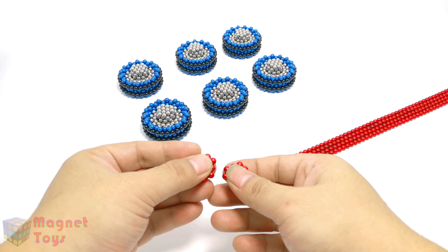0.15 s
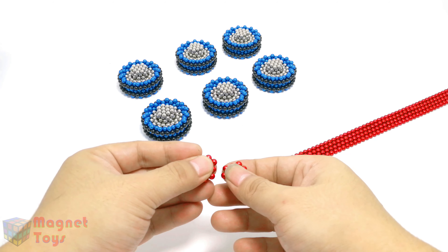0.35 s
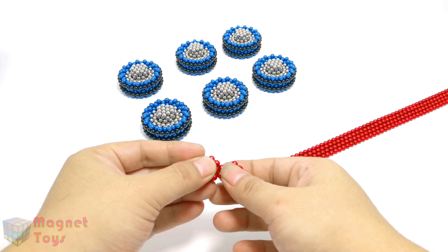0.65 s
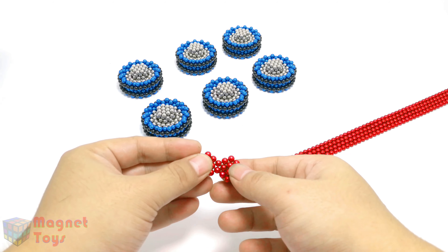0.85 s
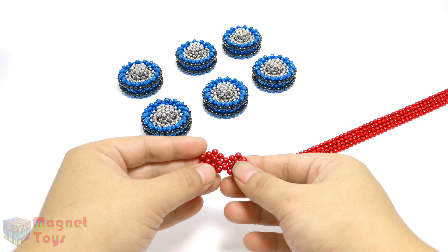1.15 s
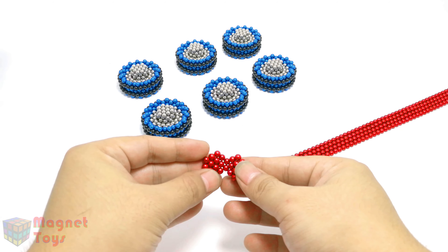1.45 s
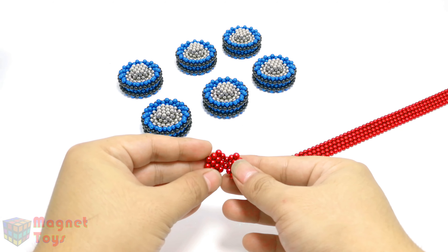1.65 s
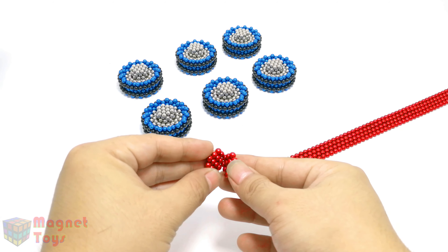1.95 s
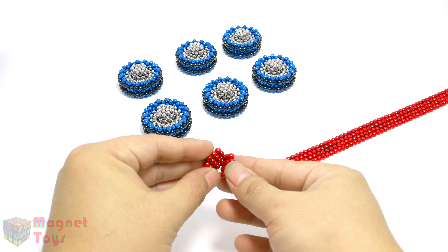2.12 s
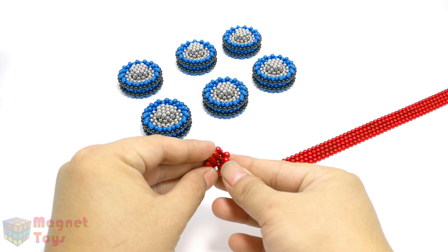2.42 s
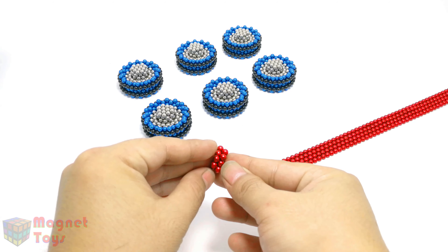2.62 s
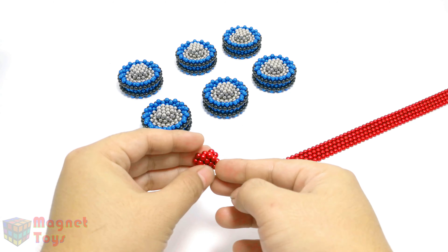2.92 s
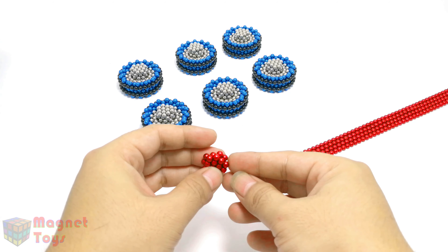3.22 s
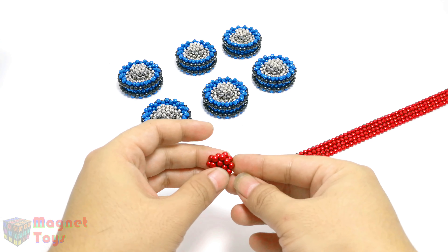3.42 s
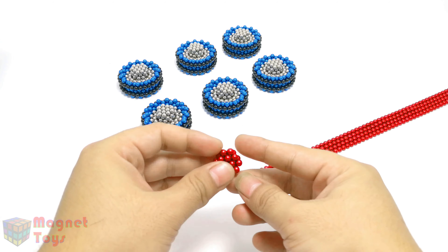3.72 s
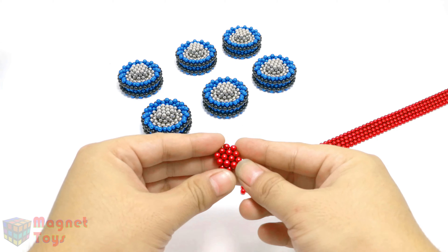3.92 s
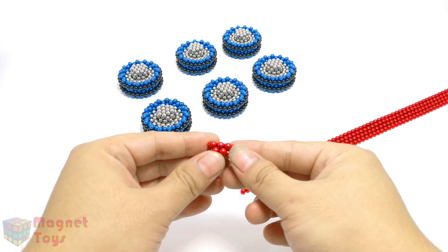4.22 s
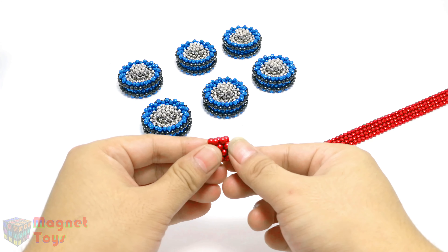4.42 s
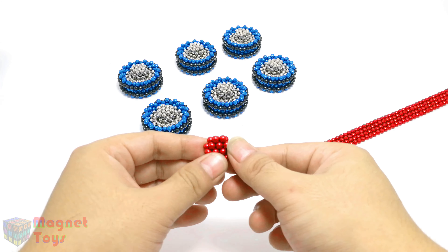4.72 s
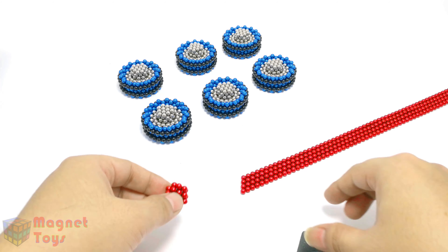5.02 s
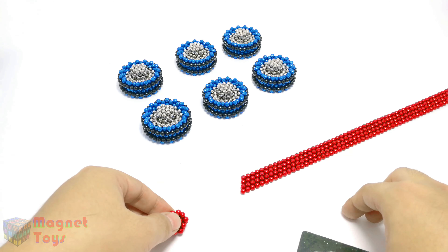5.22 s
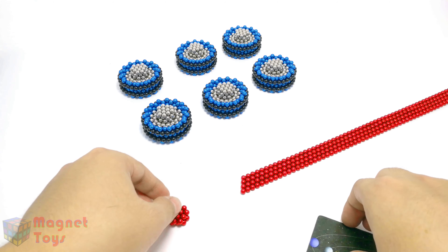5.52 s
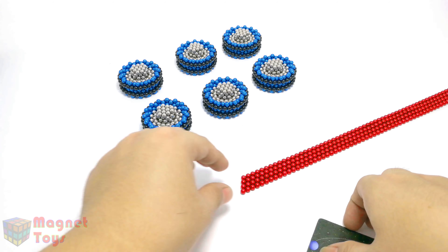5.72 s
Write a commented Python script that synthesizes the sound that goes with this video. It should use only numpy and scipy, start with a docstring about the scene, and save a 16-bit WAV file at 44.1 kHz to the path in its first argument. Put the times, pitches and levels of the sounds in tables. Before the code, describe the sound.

Small magnetic balls snap together in sharp clicks, then the piece knocks and scrapes briefly on a table over a faint fan hum.

```python
"""Small magnetic balls snap together in tiny chattering bursts, close to the left microphone in a small dry room.
The piece is then set down on a table with a knock, shoved along and tipped over with another, and fingers brush past.
Snaps are clusters of filtered clicks; knocks are short pushes that ring the modes of the table top.
Scrapes and brushes are streams of random tiny slips, and a fan hums and rushes behind them under hiss."""
import sys
import numpy as np
from scipy import signal
from scipy.fft import rfft, irfft
from scipy.io import wavfile

SR = 44100
rng = np.random.default_rng(int(sys.argv[2]) if len(sys.argv) > 2 else 0)


def to_wav(s):
    """Save 16-bit WAV."""
    ch = np.atleast_2d(s).T  # columns
    pcm = np.round(np.clip(ch, -1, 1) * 32767)  # PCM
    wavfile.write(sys.argv[1], SR, pcm.astype(np.int16))


N = 258426
TIME = np.arange(N) / SR

# balls snapping together: (time [s], level of the burst's energy [dB], fading time of the chatter [s],
# brightest frequency [Hz], strength of the first rebound [share], boost or cut of the low cluster knock [dB])
SNAPS = [(0.469, 5.5, 0.00067, 14000, 0.65, 3), (2.3644, 6, 0.00071, 8600, 0.046, -8),
         (2.3725, 5, 0.00057, 12900, 0.5, 0), (2.4929, 0.5, 0.00015, 10300, .12, -8),
         (2.4962, 4.5, 0.00055, 10200, .18, -3), (3.6055, -30.5, .0005, 9000, .2, 0),
         (4.8848, -32.5, .0005, 10000, .2, 4), (5.1513, -17, 0.0023, 9250, .13, 17),
         (5.3597, -7, .0015, 11200, 0.065, 20)]
# what one contact of two balls radiates: (frequency [Hz], level [dB])
BALL_COLOUR = [(100, -37), (600, -20.5), (1300, -14), (2800, -16.5), (3500, -13), (4500, -7), (5500, -4),
               (6700, 0.5), (7450, 0), (8400, -5.5), (10100, 0.5), (13000, 3), (14200, 6.5), (16500, -5)]
# how the snaps change on the way to the right microphone: (frequency [Hz], gain [dB])
SNAP_SHADOW = [(500, -2), (1500, -16), (3000, -17.5), (5500, -25), (8000, -28), (12000, -31), (16000, -25)]


def snaps(pull_s=0.00015, chatter=0.9, rebound_s=0.000373, focus_db=7.0, body_hz=3400, soft_hz=9800, order=6):
    """One hard contact amid a sub-millisecond chatter of neighbouring balls, followed by two quick, softer rebounds."""
    out = np.zeros(N)
    t = np.arange(-128, 384) / SR  # the hard contact is at zero
    hz = np.fft.rfftfreq(len(t), 1 / SR)
    delay = np.exp(-2j * np.pi * hz * rebound_s)
    bounce = delay / (1 + (hz / soft_hz) ** order)
    for s, db, settle_s, bright_hz, rebound, body_db in SNAPS:
        envelope = np.exp(-np.maximum(-t / pull_s, t / settle_s))
        contacts = chatter * rng.standard_normal(len(t)) * envelope
        contacts[t == 0] = 1
        # the chatter only smears the click in time; the evenly spaced rebounds give it a pitch
        smear = np.exp(1j * np.angle(rfft(contacts)))
        rebounds = 1 + rebound * bounce + (rebound * bounce) ** 2
        fade_in = np.exp(np.minimum(t, 0) / (2 * pull_s))
        clicks = irfft(smear * rebounds) * fade_in

        def ball_db(f):
            """A ball's own colour, weakened away from the brightest frequency."""
            octaves_away = abs(np.log2((f + 1) / bright_hz))
            return read(BALL_COLOUR, f) - focus_db * np.minimum(octaves_away, 1)

        burst = colour(clicks, ball_db)
        # when whole clusters collide, their mass adds a lower knock
        burst = colour(burst, lambda f: body_db / (1 + (f / body_hz) ** order))
        add(out, s + t[0], amp(db) * unit_energy(burst))
    left = out + room(out, wet_db=-3.5)
    right = colour(out + room(out, wet_db=5.5), lambda f: read(SNAP_SHADOW, f))
    return np.array([left, right])


# blows on the table: (time [s], level of the push before its treble is cut [dB],
# highest frequency that the contact excites [Hz], tilt [dB per octave])
KNOCKS = [(4.84, -8.5, 340, 0.5), (5.1518, 1.5, 2380, 5), (5.36, 1.5, 4900, 0.85), (5.748, -23, 198, -9)]


def knocks(low_hz=110, order=14):
    """Each blow is a short push: the softer the contact, the less treble it holds."""
    force = np.zeros(N)
    push = signal.unit_impulse(1024)
    for s, db, top_hz, tilt_db in KNOCKS:
        def push_db(hz):
            """A tilted spectrum with a steep upper edge."""
            tilt = tilt_db * np.log2((hz + 50) / 700)
            return tilt - 10 * np.log10(1 + (hz / top_hz) ** order)

        add(force, s, amp(db) * colour(push, push_db))
    # a board radiates little deep bass
    high_pass = signal.butter(2, low_hz, "high", fs=SR, output="sos")
    return table_top(signal.sosfilt(high_pass, force))


# modes of the table top: (frequency [Hz], level [dB], time to fall by 60 dB [s],
# lag at the right microphone [radians])
TABLE_MODES = [(187.6, -9.5, 0.15, -1.1), (273, -1, 0.12, 0.63), (377, -11, 0.12, -1.4),
               (451, -0.5, 0.064, 0.18), (554, 12, 0.042, 0.77), (608, 2, 0.12, 0.68),
               (698, 4, 0.059, 0.54), (774, -24, 0.16, 1.2), (960, -3.5, 0.087, 1.1),
               (1280, -5, 0.043, 0.22), (1816, -4, 0.08, 1.5), (1890, -16, 0.24, -1.6),
               (2617, -3, 0.09, 0.66)]
# colour of its dense short-lived modes and of its thud: (frequency [Hz], level [dB])
TABLE_WASH = [(50, -31), (130, -36), (245, -5), (320, -3), (450, 3), (620, -16), (1000, 2), (1600, -1.5),
              (2600, -1.5), (4000, 2), (8000, -20), (16000, -8.5)]


def table_top(force, wash_db=-3, wash_t60=0.11, thud_db=-8, thud_s=0.0058, echo_s=0.0086, echo_db=-4):
    """The board answers a force with a first thud, its main modes and a wash of dense ones; a nearby wall echoes it."""
    t = np.arange(SR // 2) / SR
    washes, thuds = noise_pair(len(t)), noise_pair(len(t))
    out = []
    for side in range(2):  # left, right
        modes = np.zeros(len(t))
        for hz, db, t60, lag in TABLE_MODES:
            modes += amp(db - 60 * t / t60) * np.sin(2 * np.pi * hz * t - side * lag)
        dense = colour(washes[side] * amp(-60 * t / wash_t60), lambda hz: read(TABLE_WASH, hz))
        thud = colour(thuds[side] * np.exp(-t / thud_s), lambda hz: read(TABLE_WASH, hz))
        ring = unit_energy(modes)
        ring += amp(wash_db) * unit_energy(dense)
        ring += amp(thud_db) * unit_energy(thud)
        add(ring, echo_s, amp(echo_db) * ring)
        out.append(signal.oaconvolve(force, unit_energy(ring))[:N])
    return np.array([out[0], shaded(out[1])])


# shoves of the piece along the table: (time of the middle [s], half length [s], level before colouring [dB])
SHOVES = [(5.253, 0.036, -42), (5.333, 0.019, -46.5)]
# colour of the scrape: (frequency [Hz], level [dB])
SCRAPE_COLOUR = [(200, -59), (600, 13.5), (1100, 4.5), (2400, 4), (4200, 3), (8000, -3.5), (12000, -3.5),
                 (16000, -10)]
PRESS_DB = -2  # force on the board, relative to the uncoloured slips
# judder after a blow: delay of the swell, its half length, its level relative to the blow
JUDDER_AFTER_S, JUDDER_HALF_S, JUDDER_DB = 0.047, 0.056, -38.5
# the piece rocks on the board in a narrow band: its centre, its half width, the greatest drop away from it
ROCK_HZ, ROCK_WIDTH_HZ, ROCK_DROP_DB = 662, 69, 8.5


def slide(right_db=-0.5):
    """Balls catch and slip: a fine scrape with each shove and a judder after each blow, which set the board ringing."""
    slips = unit_rms(grit(per_s=6100, spread_db=3))
    shoved = slips * sum(amp(db) * swell(s, half_s) for s, half_s, db in SHOVES)
    scrape = colour(shoved, lambda hz: read(SCRAPE_COLOUR, hz))
    left = scrape + room(scrape, wet_db=-2.0)
    right = shaded(room(scrape, wet_db=-0.5))  # reflections only
    force = amp(PRESS_DB) * shoved
    for s, db, top_hz, _ in KNOCKS:
        strength = swell(s + JUDDER_AFTER_S, JUDDER_HALF_S) * (TIME > s)
        judder = amp(db + JUDDER_DB) * slips * strength
        force += colour(judder, lambda hz: -20 * np.log10(1 + (hz / top_hz) ** 2))

    def rock_db(hz):
        """A peak at the rocking frequency."""
        peak = 1 / (1 + ((hz - ROCK_HZ) / ROCK_WIDTH_HZ) ** 2)
        return ROCK_DROP_DB * (peak - 1)

    board = table_top(colour(force, rock_db), wash_db=-5, thud_db=-14)
    return np.array([left, right]) + amp([[0], [right_db]]) * board


# fingers brushing and catching: (time of the middle [s], half length [s], level at the middle [dB],
# brightest frequency [Hz])
BRUSHES = [(3.71, .035, -59.5, 1180), (3.792, 0.056, -62.5, 1570), (5.043, 0.0021, -50, 3580),
           (5.074, .003, -52, 3560), (5.079, 0.022, -56, 3200), (5.606, 0.0026, -50, 4300),
           (5.62, 0.012, -48.5, 1960), (5.701, 0.033, -48.5, 1680), (5.753, 0.0068, -51.5, 4570),
           (5.809, 0.032, -43.5, 1760)]
# colour of rubbing skin: (distance from the brightest frequency [octaves], level [dB])
SKIN_COLOUR = [(-3, -15), (-1.2, -12), (-.6, -9), (-.25, -1), (.1, 0), (.45, -6), (1, -10), (2, -19),
               (3, -27)]


def brushes(right_db=-1):
    """Skin rubbing over balls and table: short swells of soft grit."""
    out = np.zeros(N)
    octaves, skin_db = np.transpose(SKIN_COLOUR)
    for s, half_s, db, bright_hz in BRUSHES:
        slips = grit(per_s=4600, spread_db=1.5)
        rub = colour(slips, lambda hz: np.interp(np.log2((hz + 1) / bright_hz), octaves, skin_db))
        out += amp(db) * unit_rms(rub) * swell(s, half_s)
    left = out + room(out, wet_db=-5.5)
    right = amp(right_db) * shaded(room(out, wet_db=2.5))  # reflections only
    return np.array([left, right])


# how table sounds change on the way to the right microphone: (frequency [Hz], gain [dB])
SHADOW = [(100, 2), (400, 1.5), (700, 0.5), (1100, -3.5), (2400, -5), (4400, -12.5), (8000, -17),
          (16000, -14)]


def shaded(x):
    """The sound as it reaches the right microphone, with less treble."""
    return colour(x, lambda hz: read(SHADOW, hz))


# how fast the early reflections die: (frequency [Hz], time to fall by 60 dB [s])
ROOM_T60 = [(300, 0.23), (1500, 0.077), (6000, 0.11), (11000, 0.13), (16000, 0.1)]


def room(x, wet_db, gap_s=0.0015, late_db=-17, late_stretch=1.7):
    """Dense reflections from table and hands that die fast, over a weaker, longer ring of the walls."""
    hz, t, z = signal.stft(rng.standard_normal(SR // 2), SR, nperseg=256)
    fall_db = -60 * t / read(ROOM_T60, hz)[:, None]
    fall = np.hypot(amp(fall_db), amp(late_db + fall_db / late_stretch))
    tail = signal.istft(z * fall, SR, nperseg=256)[1]
    # the reflections fade in around the gap
    tail *= np.clip(np.arange(len(tail)) / (gap_s * SR) - 0.5, 0, 1)
    return amp(wet_db) * signal.oaconvolve(x, unit_energy(tail))[:N]


# low rush at the left microphone: (frequency [Hz], level [dB per Hz])
AIR = [(12, -82.5), (24, -74.5), (33, -93), (48, -80.5), (62, -89), (100, -78), (180, -79.5), (215, -87),
       (260, -84.5), (450, -92.5), (1000, -98.5), (1700, -105), (5000, -117), (16000, -127)]
# microphone hiss: (left level [dB per Hz], right level [dB per Hz])
HISS_DB = [-105.3, -107.7]
# fan tones: (frequency [Hz], left level [dB], right level [dB], unsteady share [0-1])
FAN = [(112.3, -66, -62.5, 0.87), (192.7, -63.5, -62.5, 0.91), (538.1, -67.5, -60.5, 0.21)]


def room_tone(waver_hz=5, right_db=1.24):
    """Low rush (shaped noise) and wavering tones of a fan, under microphone hiss."""
    hz = np.fft.rfftfreq(N, 1 / SR)
    rush = irfft(rfft(noise_pair(N)) * amp(read(AIR, hz)), N)
    rush[1] *= amp(right_db)
    hiss = amp(HISS_DB)[:, None] * rng.standard_normal((2, N))
    out = np.sqrt(SR / 2) * (rush + hiss)  # turns levels per Hz into full-band levels
    for tone_hz, left_db, far_db, unsteady in FAN:
        share = np.clip(unsteady, 0, 1)
        waver = np.sqrt(1 - share ** 2) + share * drift(waver_hz)
        tone = waver * np.exp(2j * np.pi * (tone_hz * TIME + rng.random()))
        out += amp([[left_db], [far_db]]) * unit_rms(tone.real)
    return out


# how alike the noise is at both microphones: (frequency [Hz], likeness [0-1])
AIR_SAME = [(130, 0.97), (300, 0.63), (640, 0.3), (1400, 0)]


def noise_pair(size):
    """White noise at the two microphones: alike in the bass, unrelated in the treble."""
    a, b = rfft(rng.standard_normal((2, size)))
    same = np.clip(read(AIR_SAME, np.fft.rfftfreq(size, 1 / SR)), -1, 1)
    right = same * a + np.sqrt(1 - same ** 2) * b
    return irfft(np.array([a, right]), size)


def drift(rate_hz):
    """Slow random wander of strength and phase, as complex numbers of rms 1."""
    hz = np.fft.fftfreq(N, 1 / SR)
    z = np.fft.ifft(np.exp(-(hz / rate_hz) ** 2 + 2j * np.pi * rng.random(N)))
    return z / np.std(z)


def grit(per_s, spread_db):
    """A stream of tiny slips of uneven size, at random moments."""
    size = amp(spread_db * np.minimum(rng.exponential(1, N), 4))
    return size * rng.standard_normal(N) * (rng.random(N) < per_s / SR)


def swell(middle_s, half_s):
    """A stroke of the hand: it builds up and dies away evenly."""
    return np.exp(-((TIME - middle_s) / half_s) ** 2)


def colour(x, db_at, size=2048):
    """Causal filter whose gain in dB is the function db_at of frequency, down to a floor of -100 dB."""
    gain = amp(db_at(abs(np.fft.fftfreq(size, 1 / SR))))
    log_gain = np.log(np.maximum(gain, 1e-5))
    # minimum phase: the filter answers as early as it can
    taps = np.fft.ifft(np.exp(np.conj(signal.hilbert(log_gain)))).real
    return signal.oaconvolve(x, taps[:size // 2])[:len(x)]


def read(points, hz):
    """Looks up a table of (frequency [Hz], value), joined on a log-frequency axis."""
    f, value = np.transpose(points)
    return np.interp(np.log(hz + 1), np.log(f + 1), value)


def add(mix, s, sound):
    """Mixes a sound in at time s."""
    part = mix[round(s * SR):][:len(sound)]
    part += sound[:len(part)]


def amp(db):
    """Turns decibels into a factor."""
    return 10 ** (np.asarray(db) / 20)


def unit_rms(x):
    """Scales a sound to an rms of 1."""
    return x / np.sqrt(np.mean(x ** 2) + 1e-30)


def unit_energy(x):
    """Scales a sound to a total energy of 1."""
    return x / np.sqrt(np.sum(x ** 2) + 1e-30)


def scene():
    """All sources at the two microphones."""
    return snaps() + knocks() + slide() + brushes() + room_tone()


def record(dry, edge_hz=16350):
    """Band limit: a low-pass filter removes the treble above its edge."""
    low_pass = signal.firwin(255, edge_hz, window=("kaiser", 9), fs=SR)
    return signal.oaconvolve(dry, low_pass[None], "same")


dry = scene()
out = record(dry)
to_wav(out)
```